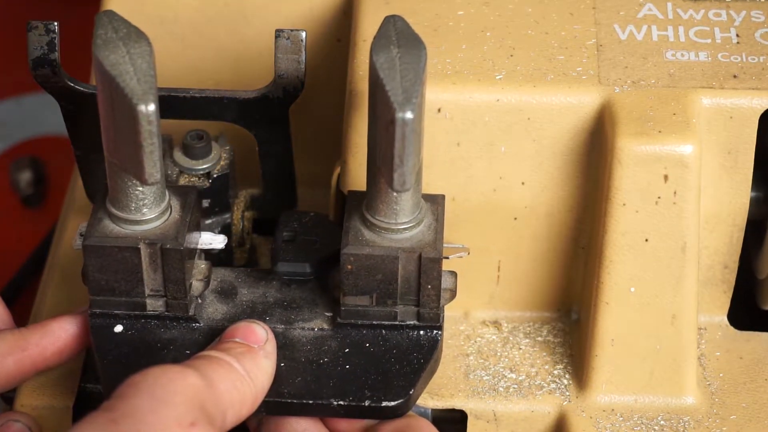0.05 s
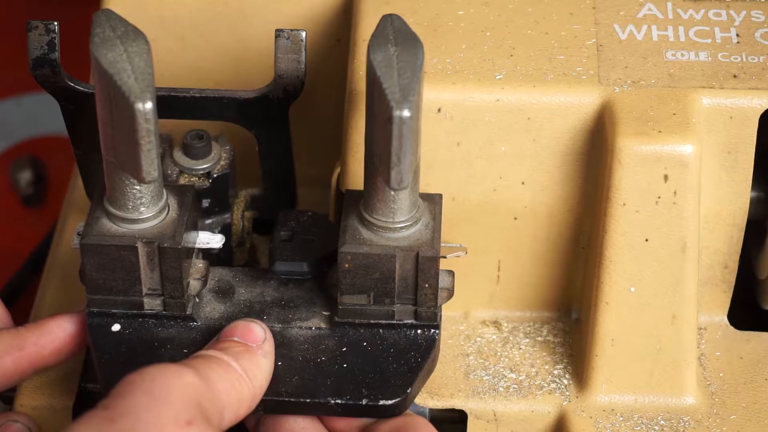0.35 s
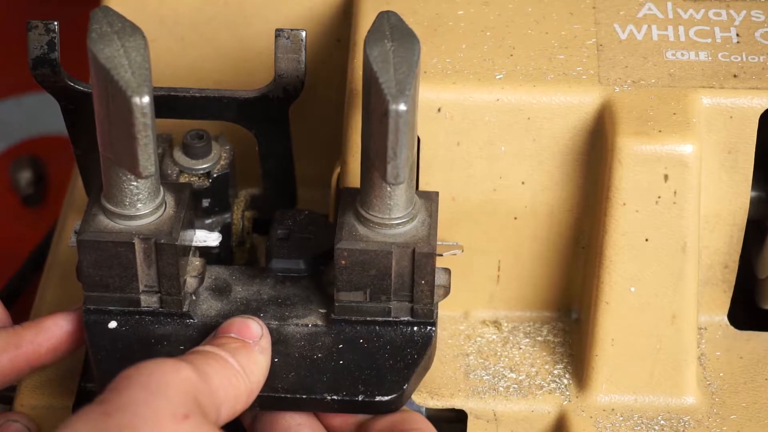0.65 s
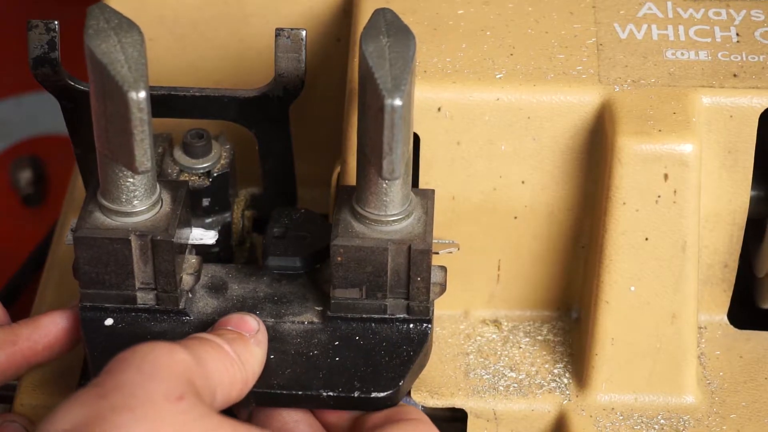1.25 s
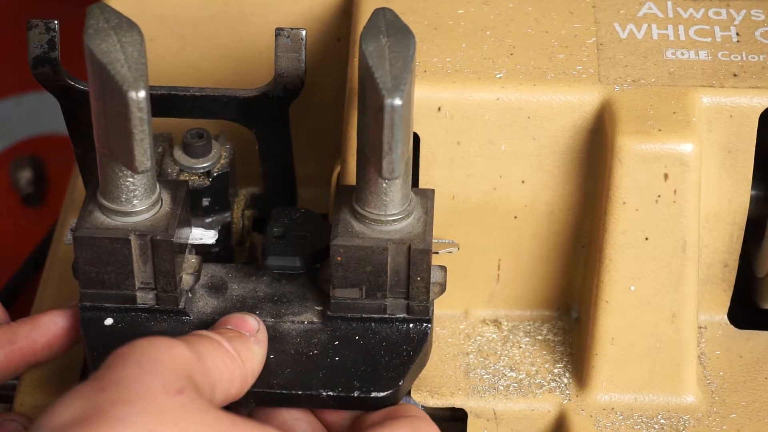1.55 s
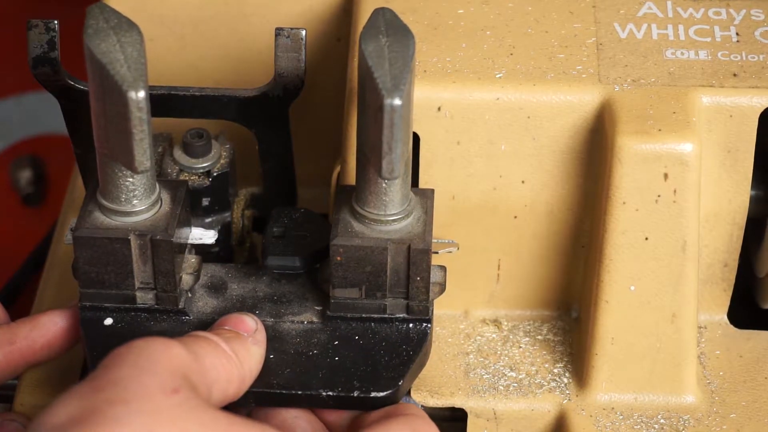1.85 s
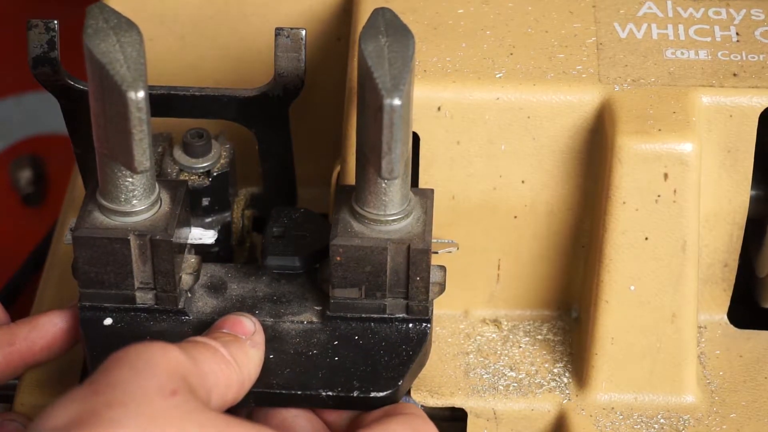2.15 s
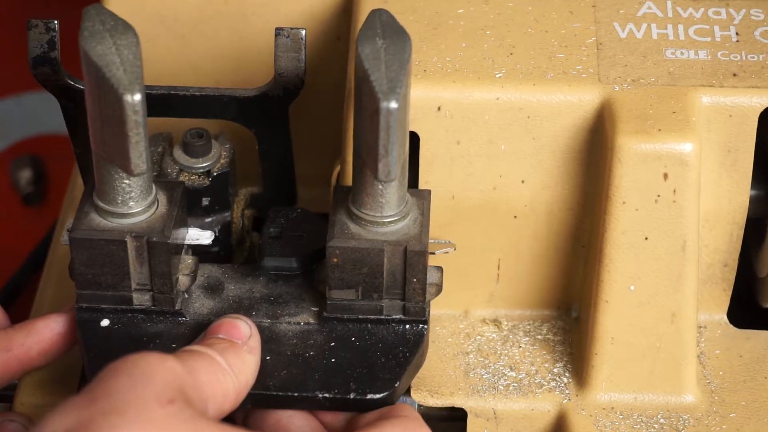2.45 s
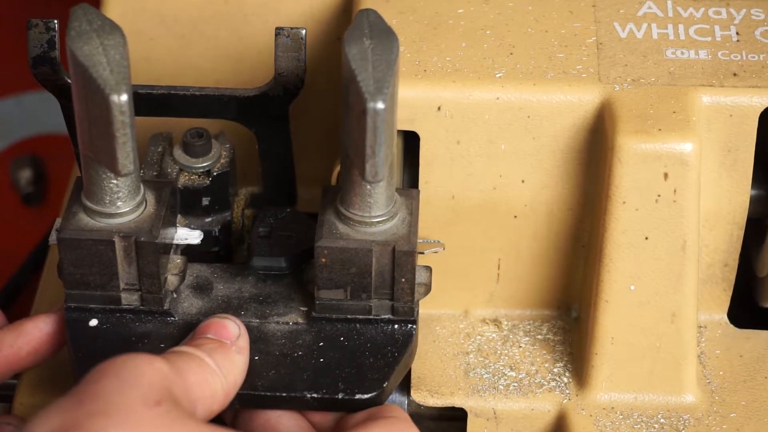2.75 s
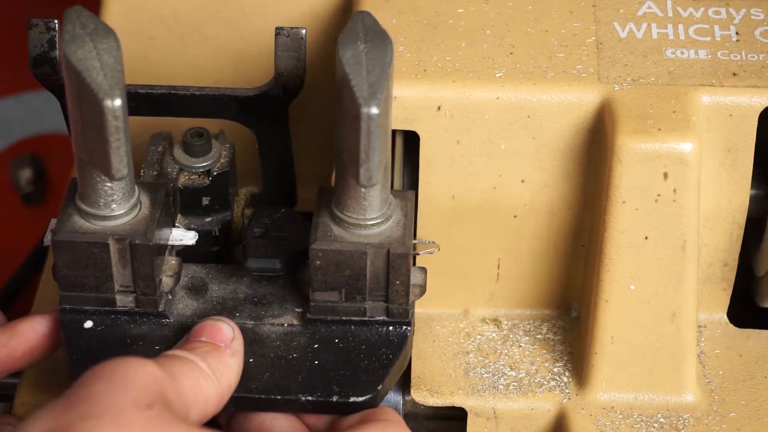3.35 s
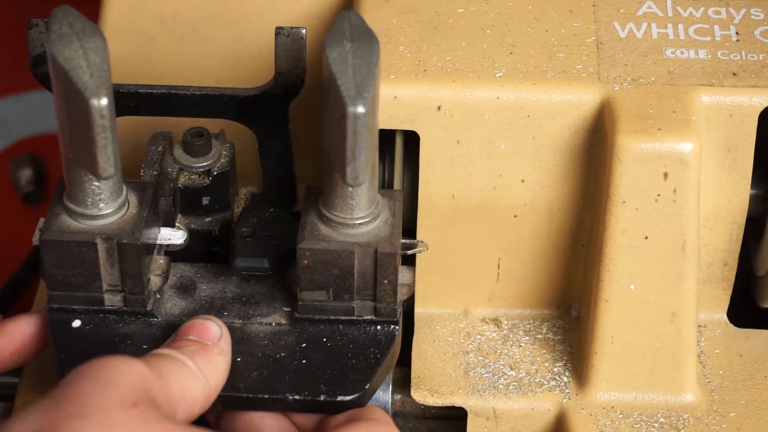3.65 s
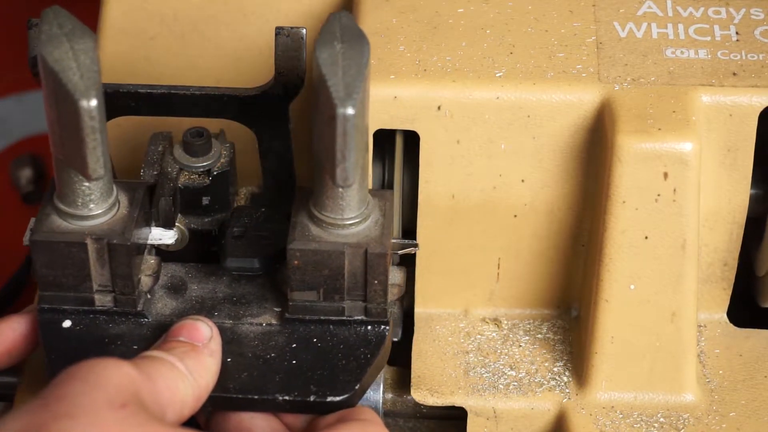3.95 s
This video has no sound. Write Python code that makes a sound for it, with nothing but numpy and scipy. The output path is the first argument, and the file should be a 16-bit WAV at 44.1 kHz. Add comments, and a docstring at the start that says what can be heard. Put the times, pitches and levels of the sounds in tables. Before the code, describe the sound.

A key cutting machine works a brass blank close by, its wheel chattering in rapid, very high ringing rasps over a motor that hums, rattles and knocks throughout. Around 2.6 seconds the cutting lets up with a faint squeak, followed by five quick dry scuffs. From about 2.9 seconds the rasps return brighter, then weaken toward 4 seconds as the motor runs on, with a slight room echo.

```python
"""A key duplicating machine cuts a brass blank, close by. From the start the motor and drive hum
and knock in a pattern that repeats every two turns of the cutter wheel. The wheel bites about once
a turn: its teeth chatter on the blank, which rings very high, and the carriage grinds and ticks.
Near 2.6 s the load comes off with a faint squeak, and five dry scuffs follow. From 2.9 s the
bites come back brighter, then weaken toward the end."""
import sys
import numpy as np
from scipy import signal
from scipy.fft import rfft, irfft, next_fast_len
from scipy.io import wavfile
from scipy.ndimage import map_coordinates

SR = 44100
rng = np.random.default_rng(int(sys.argv[2]) if len(sys.argv) > 2 else 0)


def transcribe(signal):
    """Save signal, clipped to [-1, 1], as a 16-bit WAV file at the path in sys.argv[1]."""
    frames = np.atleast_2d(signal).T
    limited = np.clip(frames, -1, 1)
    pcm = np.round(limited * 32767).astype(np.int16)
    wavfile.write(sys.argv[1], SR, pcm)


N = 176400
TURN_HZ = 19.49  # turns of the wheel per second
EARS = np.array([[.5], [-.5]])  # shares a left-right difference between the two channels


def cutter():
    """In each bite a run of uneven teeth rings and scrapes the blank and shakes the carriage."""
    # bites (time [s], contact length [s], level [dB], brightness: 14.5 kHz over 11 kHz [dB])
    bites = [(0.002, 0.024, -32, -3), (0.032, 0.0066, -21.5, -11), (0.071, 0.02, -19, -16),
             (0.122, 0.025, -21, -2.5), (0.177, 0.019, -20, -14), (0.237, 0.0077, -23, -5),
             (0.289, 0.01, -19, -7), (0.341, 0.004, -23, -1), (0.391, 0.0044, -17.5, 2),
             (0.444, 0.003, -24.5, -9), (0.479, 0.021, -15, -11), (0.535, 0.018, -15, -3.5),
             (0.588, 0.02, -15, -5), (0.644, 0.01, -16.5, -1), (0.689, 0.021, -16.5, -6.5),
             (0.748, 0.0063, -14.5, 0.5), (0.85, 0.031, -54, 4), (0.901, 0.0099, -20.5, -9),
             (0.958, 0.0026, -17.5, -8), (1.009, 0.0035, -21, -6), (1.161, 0.0051, -18.5, -4),
             (1.214, 0.0062, -17, 2), (1.265, 0.0044, -18, 6.5), (1.317, 0.0075, -19, -4),
             (1.369, 0.0098, -20, -8), (1.42, 0.0077, -17.5, -10), (1.47, 0.0061, -17, -7),
             (1.522, 0.0067, -19, 3), (1.575, 0.0033, -25, 6), (1.625, 0.0029, -21, 1.5),
             (1.655, 0.006, -27, -8), (1.705, 0.0033, -25.5, -4), (1.727, 0.0066, -14.5, 2.5),
             (1.766, 0.0022, -20.5, -8), (1.808, 0.004, -26.5, 5), (1.83, 0.0064, -14.5, -12),
             (1.862, 0.005, -18.5, 7), (1.925, 0.0079, -16, -10), (1.963, 0.004, -16.5, -2),
             (2.016, 0.0069, -25, 0), (2.033, 0.0032, -17, -6), (2.086, 0.0027, -34, -5),
             (2.117, 0.0043, -19.5, -1), (2.138, 0.004, -17, -18), (2.19, 0.0026, -17, -7),
             (2.239, 0.0027, -17, -9), (2.292, 0.0085, -17, -1), (2.322, 0.004, -16.5, -7),
             (2.343, 0.005, -16.5, -6), (2.373, 0.0087, -15.5, -4), (2.395, 0.0054, -14, 1),
             (2.426, 0.022, -15.5, 3.5), (2.453, 0.0041, -21, -9), (2.478, 0.014, -17.5, 0),
             (2.496, 0.0054, -15.5, 1), (2.547, 0.0055, -15.5, -1.5), (2.584, 0.03, -17, -4),
             (2.629, 0.032, -19, -6), (2.802, 0.024, -38, -4), (2.907, 0.013, -24.5, 12),
             (3.011, 0.0073, -21, 11), (3.041, 0.0083, -25, 1), (3.096, 0.034, -19, 6.5),
             (3.141, 0.01, -20, 6), (3.195, 0.027, -18.5, 5.5), (3.243, 0.016, -19.5, 4),
             (3.293, 0.034, -15.5, 9), (3.347, 0.02, -17, 9.5), (3.403, 0.022, -15.5, 8.5),
             (3.469, 0.011, -19.5, -10), (3.522, 0.004, -16, 9), (3.612, 0.025, -23.5, 7),
             (3.712, 0.019, -20.5, 10), (3.763, 0.025, -26.5, 5), (3.813, 0.023, -25.5, 8),
             (3.869, 0.026, -26.5, 7.5), (3.923, 0.021, -31.5, 5), (3.985, 0.0039, -23, 2)]
    # where the cutting is heard (time [s], left over right [dB])
    balance = [(0, 0), (.8, 0), (1.3, -1), (2.3, 1), (2.8, -1), (4, 2)]
    out, t = np.zeros((2, N)), np.arange(SR // 6) / SR
    for start, length, db, bright_db in bites:
        one_tooth = unit(blank_ring(t, bright_db)) + amp(-1.5) * unit(scrape(t, start, bright_db))
        hits = tooth_hits(length, len(t))[None]
        # convolving plays the sound once for every hit
        bite = signal.fftconvolve(hits, one_tooth, axes=1)[:, :len(t)]
        grind = signal.fftconvolve(hits, carriage_grind(t), axes=1)[:, :len(t)]
        loud = t < length + .008  # this part sets the level
        cut = bite / bite[:, loud].std() + amp(-19.5) * grind / grind[:, loud].std()
        add(out, start, amp(db + .5) * cut)
    return out * amp(EARS * curves(balance)[0])


def tooth_hits(length, size):
    """Teeth strike with uneven timing and force, starting quickly and dying away after contact."""
    tooth_hz, entry_s, exit_s = 1406.5, .0013, .0017
    slip, strength = rng.standard_normal((2, 128))
    times = np.abs(np.arange(len(slip)) + slip / 2) / tooth_hz
    contact = np.minimum(1, times / entry_s + .3) * np.exp(-np.maximum(0, times - length) / exit_s)
    force_db = 2 * np.exp(-times / .0026) + 6.5 * np.clip(strength, -2, 2)
    return np.bincount((times * SR).astype(int), contact * amp(force_db), size)[:size]


def blank_ring(t, bright_db):
    """The clamped blank rings at its own pitches, shifted a little by each bite's pressure."""
    # ringing tones (pitch [Hz], level [dB], time to fade by 60 dB [s], left over right [dB])
    tones = [(4760, -14.5, 0.084, -3), (4833, -15, 0.042, 5), (5170, -22, 0.027, 5),
             (5470, -12.5, 0.049, -2.5), (6340, -22, 0.077, 14), (7790, -19.5, 0.076, 6),
             (10550, -10, 0.043, 25), (10710, 2, 0.062, 1), (10900, -1, 0.062, 0), (11000, -4.5, 0.041, 9),
             (11570, -24, 0.069, -8), (12630, -5, 0.041, -4), (14220, -17, 0.051, 1), (14400, -5, 0.027, 8),
             (14260, -1.5, 0.033, -6), (14540, 2.5, 0.14, -2)]
    hz, db, fade_s, pan_db = np.transpose(tones)
    scatter, phase, spread, shift = rng.standard_normal((4, len(hz)))
    shifted_hz = hz * (1 + .0015 * shift)
    rings = amp(-60 * t / fade_s[:, None]) * np.exp(2j * np.pi * shifted_hz[:, None] * t)
    gains = amp(db + .5 * scatter + bright_db * tilt(hz) + EARS * pan_db)
    phases = np.exp(2j * (np.pi * phase + EARS * .62 * spread))
    return ((gains * phases) @ rings).real


def scrape(t, start, bright_db):
    """A tooth scrapes the brass: a short hiss that rasps more as the cut deepens."""
    # tone of the scrape (frequency [Hz], level [dB])
    spectrum = [(2000, -62), (4100, -25), (4750, -7.5), (5500, -17.5), (5900, -25.5), (8600, -16),
                (9900, -9), (10700, 8.5), (11700, -0.5), (13300, 1.5), (14600, 4.5), (15600, 8),
                (16500, -22)]
    # rasp of the cut (time [s], boost below 10 kHz [dB])
    rasp = [(0, -8), (1, 8), (2, -3.5), (2.45, 4), (2.8, 6), (3.3, 6.5), (4, 12.5)]
    rasp_db = np.interp(start, *np.transpose(rasp))
    colour = [(hz, db + bright_db * tilt(hz) + rasp_db * (hz < 10000)) for hz, db in spectrum]
    return stereo_noise(colour, len(t), width=.83) * amp(-60 * t / .06)


def carriage_grind(t):
    """A tooth shakes the carriage that holds the blank: a lower burst of noise."""
    # tone of the grinding (frequency [Hz], level [dB])
    spectrum = [(150, -55), (600, -34), (1200, -17), (1600, 17), (2200, 10), (2800, -8.5), (3300, -1.5),
                (4200, -11), (9000, -48)]
    return stereo_noise(spectrum, len(t)) * amp(-60 * t / .086)


def drive():
    """The turning drive rumbles, rattles, hums and knocks."""
    # loudness of its parts (time [s], rumble [dB], knocks [dB], hum [dB], rattle [dB])
    levels = [(0.0, -39.5, -34, -39, -40.5), (0.1, -43.5, -41.5, -42.5, -40.5),
              (0.19, -37.5, -37.5, -36.5, -39), (1.09, -32.5, -30, -33.5, -34.5),
              (1.22, -35, -34, -34.5, -34), (1.57, -38, -36.5, -36.5, -39.5),
              (1.68, -33.5, -30.5, -34, -34), (2.22, -31.5, -29.5, -30, -32),
              (2.57, -29.5, -28.5, -29, -31), (2.6, -44, -37.5, -39, -39), (2.67, -40.5, -38.5, -41.5, -41),
              (2.82, -33.5, -31, -32.5, -35), (3.3, -34.5, -30.5, -32.5, -34), (3.44, -33, -31, -32.5, -32),
              (3.48, -36, -34.5, -35.5, -37.5), (3.79, -31.5, -27, -30.5, -32),
              (3.81, -32, -31, -29.5, -32), (4.0, -31.5, -26, -33, -30.5)]
    # tone of the rumble and of the rattle (frequency [Hz], level [dB])
    rumble_tone = [(20, -16), (45, -13), (95, -8.5), (125, -3), (200, -3), (290, 1), (350, -10),
                   (430, -0.5), (560, -6.5), (680, -1.5), (780, -9), (900, -8.5), (1000, -3.5), (1150, -23),
                   (2500, -67)]
    rattle_tone = [(150, -65), (700, 6.5), (1100, 1), (1280, 6), (1650, -1), (1800, -1), (2000, -1),
                   (2350, -1), (2800, -12.5), (3300, -5), (4000, -15), (8000, -19.5), (15000, -30)]
    # stereo width of the rumble (frequency [Hz], side over middle [dB])
    rumble_width = [(30, -21), (120, -27), (250, -31.5), (500, -10), (1000, -5.5)]
    rumble_db, knock_db, hum_db, rattle_db = curves(levels)
    middle, side = (turning_noise(rumble_tone, share=.3) for _ in range(2))
    rumble = stereo(middle, filtered(side, rumble_width))
    middle, side = (turning_noise(rattle_tone, share=.4) for _ in range(2))
    rattle = stereo(middle, amp(-7) * side)
    return (amp(rumble_db + 2) * rumble + amp(rattle_db - .5) * rattle
            + amp(hum_db + 5.5) * motor_hum() + amp(knock_db + 3.5) * housing_knocks())


def turning_noise(spectrum, share):
    """Rolling noise of which a share comes round again every two turns."""
    size = round(2 * SR / TURN_HZ)
    harmonic = np.arange(size // 2 + 1)
    # weaker odd harmonics make the two turns more alike
    gain = amp(along(spectrum, harmonic * SR / size) - 5 * (harmonic % 2))
    loop = unit(irfft(gain * np.exp(2j * np.pi * rng.random(len(gain))), size))
    return np.sqrt(share) * np.resize(loop, N) + np.sqrt(1 - share) * noise(spectrum, N)


def motor_hum():
    """Motor and drive hum at steady pitches, each wavering slightly in level."""
    # tones of the hum (pitch [Hz], level [dB])
    tones = [(120, -24), (272.9, -16.5), (311.8, -15), (389.8, -20.5), (487.2, -9), (545.8, -14.5),
             (604.2, -15.5), (721.3, -51), (799.1, -11), (994, -13.5), (1247.4, -21), (1919.8, -19.5),
             (2075.7, -22)]
    t = np.arange(N) / SR
    return sum(amp(db + .2 * wobble(5.88)) * np.sqrt(2) * np.sin(2 * np.pi * (hz * t + rng.random()))
               for hz, db in tones)


def housing_knocks():
    """The housing knocks hollowly on every turn."""
    # knocks within two turns (position [turns], pitch [Hz], level [dB], swell time [s])
    pattern = [(.95, 592, 7.7, .0058), (1.95, 562, 7.2, .0058), (.14, 765, -2.5, .006),
               (1.14, 770, -2.5, .006), (.46, 580, -1, .004), (1.33, 555, -1, .004)]
    turns, knocks = np.arange(N) / SR * TURN_HZ, np.zeros(N, complex)
    for position, hz, db, swell in pattern:
        since = ((turns - position + 1) % 2 - 1) / TURN_HZ  # seconds from the nearest peak
        width = swell * np.where(since < 0, .8, 1.15)  # rises faster than it fades
        level = amp(db + .3 * wobble(10)) * np.exp(-.5 * (since / width) ** 2)
        knocks += level * np.exp(2j * np.pi * (hz * since + rng.random()))
    return stereo(knocks.real, amp(-20.5) * knocks.imag)


def carriage_ticks():
    """The carriage ticks softly now and then."""
    # ticks (time [s], level [dB])
    ticks = [(.647, -35.5), (1.698, -36.5), (1.797, -36.5), (2.306, -35), (2.88, -35), (2.982, -36.5),
             (3.387, -36.5), (3.963, -34.5)]
    # their tone (frequency [Hz], level [dB])
    spectrum = [(1500, -46), (2850, -15), (3250, 2), (3650, -3.5), (4100, -19), (8000, -47)]
    return bursts(ticks, spectrum, rise_s=.0057)


def dry_scuffs():
    """Something, probably the belt, scuffs every two turns for a moment."""
    # scuffs (time [s], level [dB])
    scuffs = [(2.725, -27.5), (2.826, -30.5), (2.928, -26), (3.031, -26.5), (3.133, -29.5)]
    # their tone (frequency [Hz], level [dB])
    spectrum = [(300, -40), (1500, -1), (2500, -0.5), (4000, -4.5), (6500, -1.5), (8500, -3.5), (10000, -9),
                (15000, -4.5)]
    return bursts(scuffs, spectrum, rise_s=.0063)


def squeak():
    """One faint, unsteady squeak as the load comes off."""
    # course of the squeak (time [s], pitch [Hz], level [dB])
    course = [(2.57, 1715, -70), (2.61, 1560, -37), (2.66, 1546, -38), (2.72, 1615, -38), (2.77, 1590, -70)]
    hz, db = curves(course)
    tone = np.sin(2 * np.pi * np.cumsum(hz * (1 + .017 * wobble(200))) / SR)
    return amp(db) * (db > db.min()) * tone


def room(x):
    """The room adds a short wash of echoes, different at each ear."""
    # how long echoes last (frequency [Hz], time to fade by 60 dB [s])
    fades = [(200, .3), (3000, 1), (11000, 0.35), (16000, 0.19)]
    hz, t, bands = signal.stft(rng.standard_normal((2, SR // 2)), SR, nperseg=256)
    tail = signal.istft(bands * amp(-60 * t / along(fades, hz)[:, None]), SR, nperseg=256)[1]
    return signal.fftconvolve(x, tail / np.linalg.norm(tail[0]), axes=1)[:, :N]


def bursts(events, spectrum, rise_s):
    """Puffs of noise that swell and fade within milliseconds."""
    out, t = np.zeros((2, N)), np.arange(SR // 12) / SR
    shape = t / rise_s * np.exp(1 - t / rise_s)
    for start, db in events:
        add(out, start, amp(db) * shape * stereo_noise(spectrum, len(t)))
    return out


def tilt(hz):
    """Brightness turns the sound down near 11 kHz and up from about 13 kHz."""
    return np.interp(hz, [8000, 10500, 11000, 14500], [0, -.5, -.5, .5])


def amp(db):
    return 10 ** (np.asarray(db) / 20)


def unit(x):
    return x / np.sqrt(np.mean(x ** 2) + 1e-20)


def along(points, hz):
    """Read between (frequency, value) points on a log scale."""
    freqs, values = np.transpose(points)
    return np.interp(np.log(hz + 1), np.log(freqs + 1), values)


def curves(rows):
    """One value per sample for each column after the time."""
    times, *columns = np.transpose(rows)
    return [np.interp(np.arange(N) / SR, times, column) for column in columns]


def wobble(rate):
    """A smooth curve through `rate` random values a second."""
    return map_coordinates(rng.standard_normal(int(N * rate / SR) + 4), [np.arange(N) * rate / SR])


def filtered(x, spectrum):
    return irfft(rfft(x) * amp(along(spectrum, np.fft.rfftfreq(len(x), 1 / SR))), len(x))


def noise(spectrum, size):
    return unit(filtered(rng.standard_normal(size), spectrum))


def stereo(middle, side):
    return np.array([middle + side, middle - side])


def stereo_noise(spectrum, size, width=.5):
    return stereo(noise(spectrum, size), width * noise(spectrum, size))


def add(track, start, x):
    """Mix x into the track at `start` seconds."""
    i = max(0, round(start * SR))
    n = max(0, min(x.shape[-1], N - i))
    track[..., i:i + n] += x[..., :n]


def scene():
    """The cutting and small noises echo in the room, with the drive underneath."""
    metal = cutter() + carriage_ticks() + dry_scuffs() + squeak()
    return metal + amp(-9) * room(metal) + drive()


def record(dry):
    """Clip at full scale and cut off the very highest treble."""
    top_hz, size = 15850, next_fast_len(N + SR // 2)
    hz = np.fft.rfftfreq(size, 1 / SR)
    spectrum = rfft(np.clip(dry, -1, 1), size)
    return irfft(spectrum / np.sqrt(1 + (hz / top_hz) ** 160), size)[:, :N]


dry = scene()
out = record(dry)
transcribe(out)
```